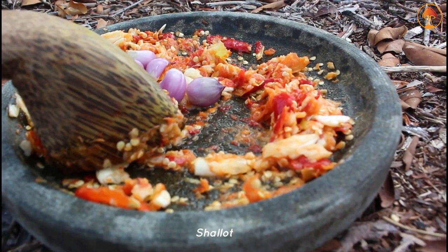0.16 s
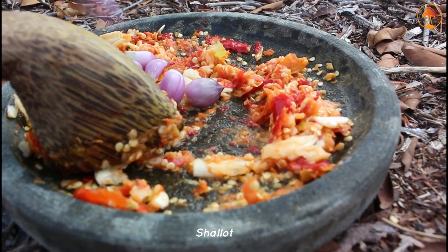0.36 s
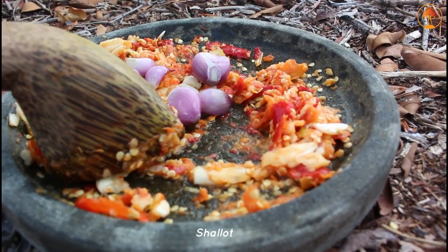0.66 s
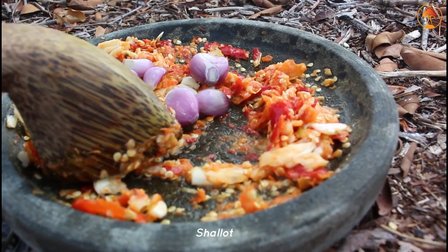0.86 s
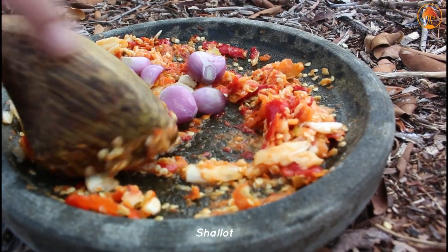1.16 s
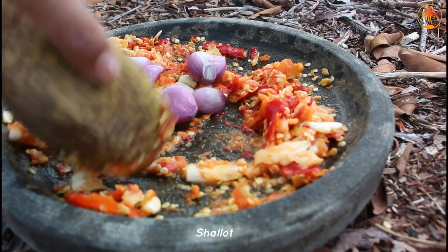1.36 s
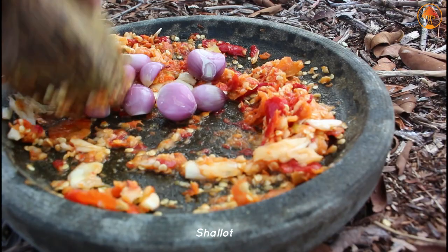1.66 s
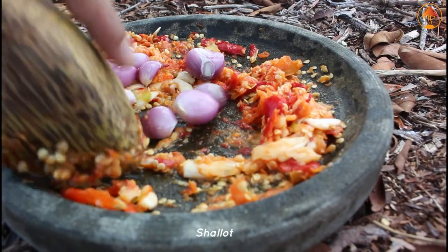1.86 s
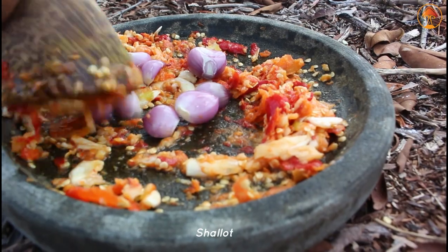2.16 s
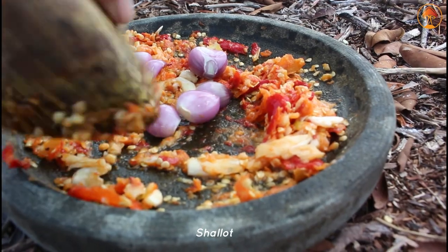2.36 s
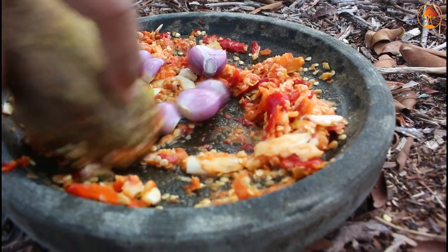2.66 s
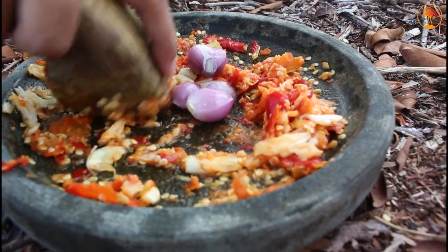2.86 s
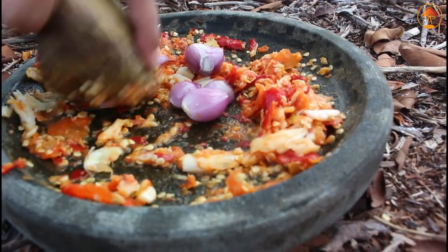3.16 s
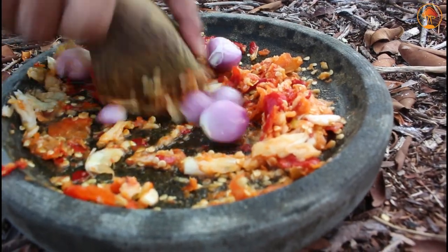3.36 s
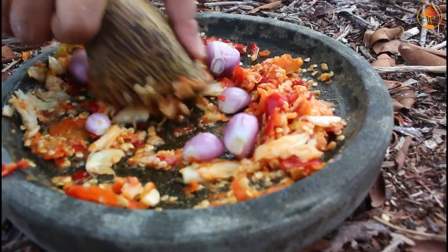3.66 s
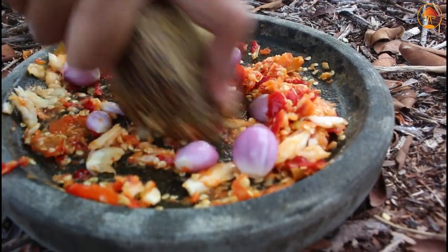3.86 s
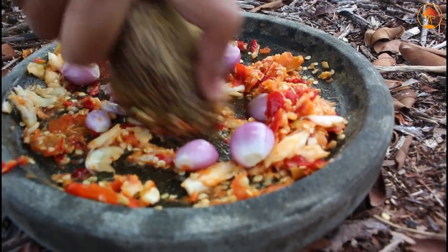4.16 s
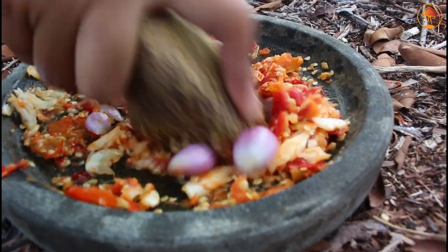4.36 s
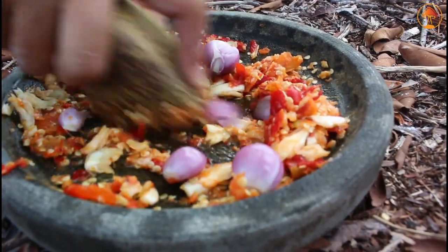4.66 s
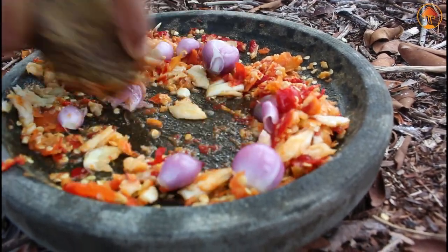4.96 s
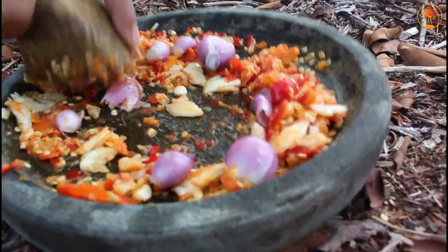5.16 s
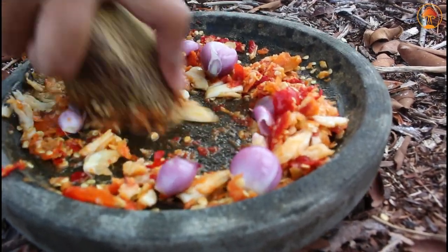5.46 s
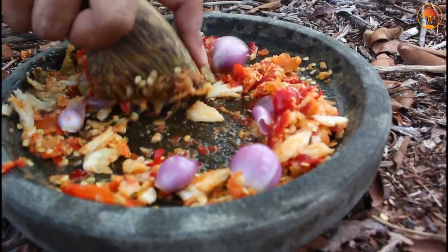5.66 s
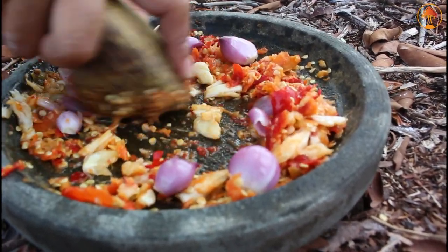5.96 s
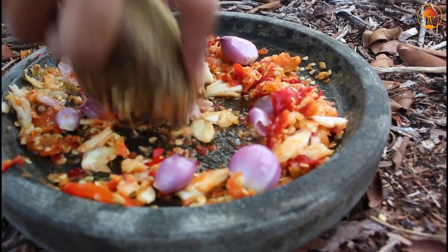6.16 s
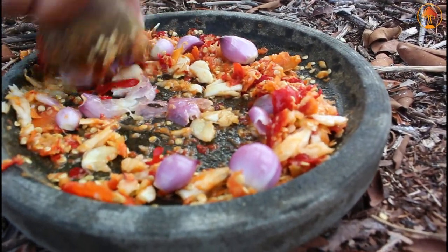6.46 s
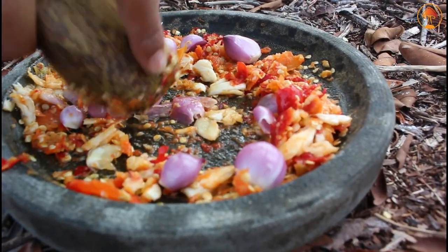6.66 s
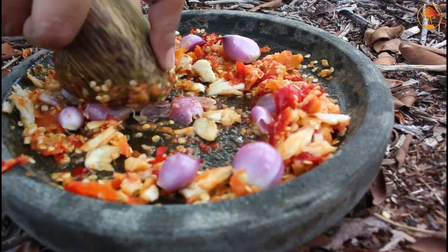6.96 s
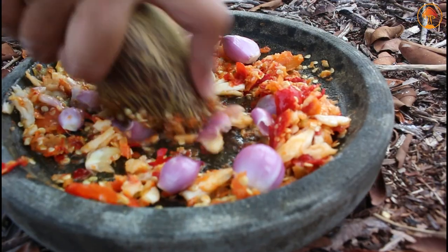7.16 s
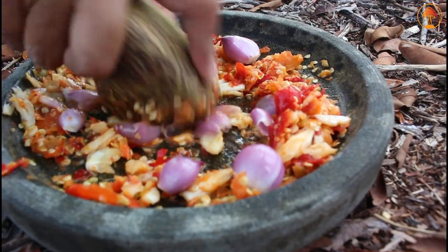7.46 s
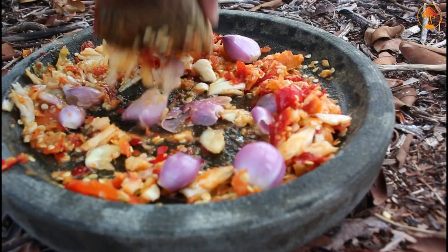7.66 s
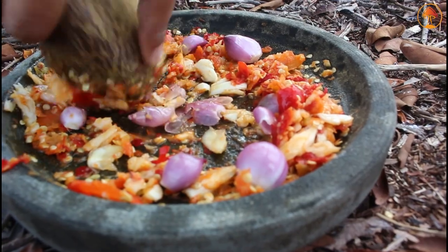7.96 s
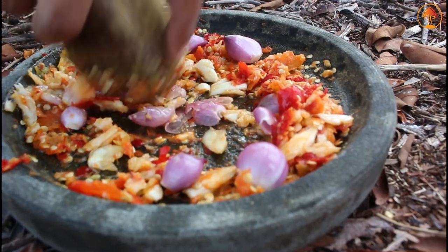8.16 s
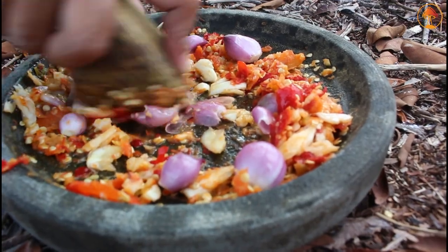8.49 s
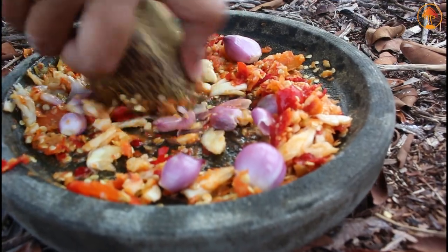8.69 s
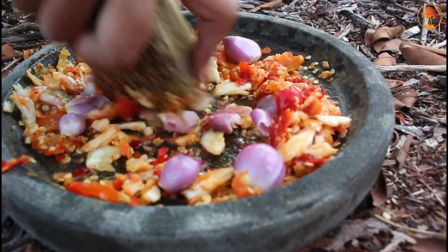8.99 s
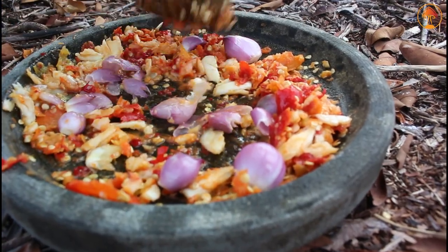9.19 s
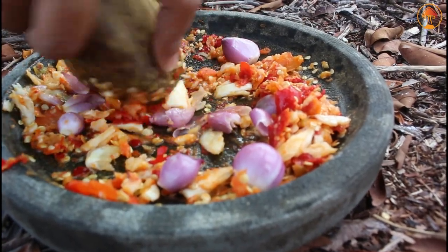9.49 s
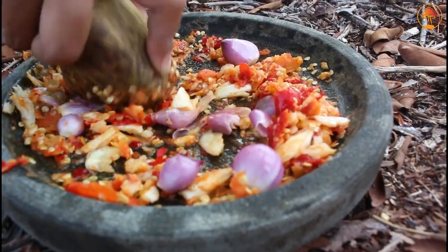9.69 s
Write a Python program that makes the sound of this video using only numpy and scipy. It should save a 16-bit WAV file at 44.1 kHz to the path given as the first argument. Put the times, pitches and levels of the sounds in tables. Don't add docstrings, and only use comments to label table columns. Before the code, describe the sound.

A close microphone beside a stone mortar outdoors catches three quiet seconds of air, insects, soft bird calls and light rustling touches. Heavy rolling grinding follows, crisp and juicy, with seed snaps, tearing flesh, small squelches and gritty stone singing. It eases near six seconds, then separate firm presses crack whole shallots loudly, with gaps of near silence between them and softer crunches at the end.

```python
import sys
import numpy as np
from scipy import signal
from scipy.fft import rfft, irfft, next_fast_len
from scipy.io import wavfile
from scipy.ndimage import uniform_filter1d, map_coordinates

SR = 44100
rng = np.random.default_rng(int(sys.argv[2]) if len(sys.argv) > 2 else 0)


def makeup_ratio(level_db):
    decades = np.asarray(level_db, float) / 20
    return 10 ** decades


def store_wav(level_fs):
    pcm = np.round(np.clip(np.atleast_2d(level_fs), -1, 1) * 32767)
    wavfile.write(sys.argv[1], SR, pcm.T.astype(np.int16))


N = 433503

# (frequency [Hz], level [dB per Hz])
FOREST_COLOUR = [(50, -40.5), (120, -7.5), (330, -12.5), (1000, -20.5), (2000, -22), (5000, -24.5),
                 (15800, -28.5), (16500, -39)]
# (frequency [Hz], level [dB per Hz])
FOREST_SIDE_COLOUR = [(30, -6), (400, -8.5), (15200, -14), (16500, -41)]
# (frequency [Hz], level [dB per Hz])
INSECT_COLOUR = [(6600, -28.5), (7400, -5.5), (8400, -5.5), (9300, -29)]
FOREST_DB = -73.5

# (time [s], length [s], top pitch [Hz], last pitch [Hz], level [dB])
HOOTS = [(1.29, 0.19, 1192, 1100, -71), (1.486, 0.043, 1116, 1114, -72), (1.566, 0.029, 1090, 1200, -67),
         (1.65, 0.14, 1164, 1135, -67), (1.893, 0.16, 1138, 1070, -67.5),
         (2.145, 0.0696, 1090, 1116, -63.5), (2.367, 0.067, 1095, 1140, -67),
         (2.611, 0.066, 1065, 1140, -67), (2.877, 0.045, 1040, 1150, -65.5)]
# (time [s], length [s], first pitch [Hz], last pitch [Hz], level [dB])
GLIDES = [
    (2.47, 0.075, 1300, 1126, -72.5),
    (2.66, 0.186, 1280, 1160, -81),
    (2.902, 0.205, 1220, 1192, -81),
    (1.12, 0.157, 4800, 3500, -74),
    (1.141, 0.075, 5950, 5950, -76),
    (2.125, 0.062, 5900, 5760, -72),
    (2.158, 0.075, 3800, 3550, -70),
    (2.163, .058, 3500, 3060, -68),
    (2.99, .05, 1220, 1200, -73.5),
    (6.39, 0.106, 3740, 3780, -73.5),
]
SCOOP = 0.93
GLIDE_EARLY = 0.34

# (time [s], thud level [dB])
WEIGHT = [(0.0, -69), (3.2, -73.5), (3.34, -45.5), (3.72, -68), (3.78, -51.5), (4.82, -68), (6.38, -59),
          (6.95, -66), (7.09, -49.5), (7.17, -74), (7.34, -58), (8.38, -69.5), (8.9, -61.5), (9.09, -78),
          (9.22, -57.5), (9.53, -84.5), (9.83, -60.5)]
# (frequency [Hz], width [Hz], level [dB])
THUMP_MODES = [(50, 16, 4), (326, 740, -10)]
THUMP_DB, THUMP_GROWS = 3, 0.75
TREMOR_DB, TREMOR_GROWS = -35.5, 0.33

# (time [s], peak level [dB], dull tock level [dB], contact time [s])
KNOCKS = [(0.447, -66.5, 12.5, 0.000086), (1.866, -54, -2.5, 0.000029), (2.139, -85, 25, 0.00015),
          (3.473, -41.5, 14, 0.000048), (4.594, -60, 6, 0.0000346), (5.072, -27, -4.5, 0.00018),
          (5.079, -69.5, 25.5, 0.00012), (5.176, -50, -8, .00012), (6.843, -76, 18, 0.000024),
          (7.82, -58.5, -3, .00004)]
# (frequency [Hz], level [dB], decay t60 [s])
STONE_MODES = [(1605, 0, .115), (2770, -12, .035), (3955, -8, .035), (5045, -10, .035)]
# (frequency [Hz], width [Hz], level [dB])
HELD_MODES = [(1605, 25, -6), (2790, 90, 0), (5050, 110, -5)]
# (frequency [Hz], width [Hz], level [dB])
WOOD_MODES = [(450, 234, -1), (803, 396.8, 0)]

# (peak time [s], dull scrape level [dB], stone ring over scrape [dB],
# fall time per 20 dB [s])
DRAGS = [(.79, -70.5, -40, 0.16), (3.31, -60.5, -3, 0.22), (3.41, -58.5, -7, 0.25),
         (3.488, -33, -7.5, 0.0014), (3.54, -69, 14, 0.2), (3.76, -57.5, 0, 0.2142),
         (3.906, -37.5, -12, 0.05), (4.115, -58.5, -2, 0.38), (4.217, -42.5, -20, 0.0427),
         (4.368, -54.5, 5, 0.1182), (4.536, -36.5, -21, 0.0453), (4.73, -56, 7, 0.1),
         (5.16, -56, -14, 0.06), (5.229, -55, -18, 0.05), (5.433, -51, -10, 0.0075),
         (5.519, -58.5, -9, 0.08), (5.665, -48, -5, 0.0157), (5.785, -59.5, 10, 0.15),
         (5.91, -49.5, 2, 0.06), (6.06, -60.5, -1, 0.1366), (6.8, -74.5, -40, 0.4),
         (7.063, -52.5, -20, 0.0156), (7.19, -53.5, 3, 0.19), (7.375, -58.5, 3, 0.19),
         (7.9, -66.5, -16, -0.17), (8.517, -62.5, -14.5, 0.1945), (8.6, -61, -18, 0.14),
         (8.874, -52.5, -14.5, 0.13), (9.36, -68, 9, 0.23), (9.83, -71, -22, -0.1)]
# (frequency [Hz], width [Hz], level [dB])
HOLLOW_MODES = [(397, 280, -8), (668, 130, -3.5), (952, 220, -0.5), (1830, 970, -8.5)]
# (time [s], length [s], low, middle and high mode levels [dB])
SINGS = [(3.469, 0.0249, -55, -36.5, -48.5), (3.529, 0.0197, -64, -51, -54),
         (3.697, 0.094, -74, -47, -56.5), (4.036, .09, -68, -52, -59.5), (4.171, .11, -75, -54.5, -59.5),
         (4.335, 0.048, -70, -45, -56.5), (4.488, 0.104, -71, -60, -60), (5.169, 0.022, -55, -70.5, -68.5),
         (5.23, 0.031, -64, -69.5, -74.5), (5.499, 0.0347, -70, -54, -65),
         (5.627, 0.0654, -60, -43.5, -59.5), (5.708, .09, -69, -51.5, -60.5), (5.866, 0.049, -59, -71, -57),
         (6.879, 0.067, -87, -72, -83), (7.029, 0.0148, -72, -44, -64.5), (8.314, 0.031, -80, -62, -70.5),
         (9.266, 0.1607, -74, -52, -64.5)]
DRAG_RISE = 0.9169
RING_SPAN = 1
HOLLOW_LAG_S = 0.013
SING_EDGE = 0.34

# (time [s], peak level [dB], pitch [Hz])
SPITS = [(0.4472, -44.5, 7500), (3.3228, -38, 10090), (3.4387, -39, 9800), (3.4695, -25, 7190),
         (3.7442, -37, 9733), (3.7658, -39, 10410), (3.9378, -41, 13640), (3.9487, -38, 7739),
         (4.1042, -37, 9420), (4.2982, -44, 12060), (4.4154, -44, 9422), (4.421, -40, 8760),
         (4.6723, -35, 9920), (5.2354, -38.5, 8450), (5.3828, -34, 7260), (5.4082, -34, 7310),
         (5.4175, -34, 7130), (5.4437, -32, 9688), (5.4617, -38, 10030), (5.4706, -41, 8448),
         (5.6827, -42, 8360), (5.7741, -32, 11220), (6.0946, -32, 7280), (6.1066, -43, 7350),
         (7.0447, -34.5, 8737), (7.1104, -36, 13350), (7.1715, -36, 8290), (7.1913, -31, 10170),
         (7.1938, -40, 9110), (7.3315, -35, 9990), (7.3742, -43, 9370), (7.435, -34, 7184),
         (8.4614, -36, 7545), (8.5117, -37, 8300), (8.5813, -34, 7560), (8.7394, -42, 14730),
         (8.8863, -35.5, 9790), (8.8923, -39, 9642), (8.9085, -41, 7920), (9.6357, -41.5, 12930)]
# (time [s], peak level [dB])
GULPS = [
    (3.4728, -16),
    (3.4855, -19.5),
    (4.526, -27),
    (4.538, -30.5),
    (4.596, -35),
]
# (frequency [Hz], width [Hz], level [dB])
POCKET_MODES = [(960, 170, 33)]
SPIT_T60, SPIT_DB = 0.0046, 4.5

# (time [s], peak level [dB], pitch [Hz])
SNAPS = [(0.4476, -32.5, 3090), (1.0844, -43, 6700), (3.2326, -28, 5100), (3.3076, -7.5, 5230),
         (3.3267, -18, 5490), (3.731, -11, 5540), (4.783, -27, 3490), (5.2362, -27, 3400),
         (5.246, -28, 3500), (5.3085, -20, 6400), (5.3827, -13.5, 3730), (5.4284, -6, 3650),
         (5.6423, -17.5, 4600), (5.7807, -34.5, 3494), (6.1469, -48.5, 4725), (7.0296, -19, 3300),
         (7.1185, -14, 3440), (7.1622, -20, 3050), (7.325, -24.5, 3952), (7.3845, -14, 2623),
         (8.462, -17, 3290), (8.608, -16, 3540), (8.8744, -17, 2690), (9.738, -32.5, 3380),
         (9.8217, -41, 6710)]
# (time [s], peak level [dB], pitch [Hz])
SPLITS = [(1.281, -50, 6400), (1.293, -50, 5300), (1.309, -43, 2580), (2.243, -45, 3000),
          (2.286, -48.5, 3300), (2.701, -46, 5460), (3.47, -17.5, 5050), (3.9433, -17, 3500),
          (4.1437, -25, 3180), (4.2805, -22, 3748), (5.348, -34.5, 3500), (5.3541, -33, 3690),
          (5.4168, -14, 3930), (7.0418, -17, 3127), (7.045, -18.5, 3025), (7.1712, -25.5, 3180),
          (7.332, -24.5, 3845), (7.368, -26, 3370), (7.435, -25, 3500), (8.4145, -30, 3100),
          (8.659, -40.5, 2000), (8.497, -21.5, 2570), (8.9267, -36.5, 5059)]
# (time [s], peak level [dB], pitch [Hz])
TEARS = [(2.872, -50, 3600), (3.2972, -9.5, 3500), (3.4221, -23.5, 5390), (3.9974, -11, 3390),
         (5.6321, -28.5, 4710), (7.0656, -16, 3294), (7.0687, -19, 3500), (7.0712, -17.5, 3400),
         (7.0744, -20, 3310), (7.1904, -23, 3754), (8.2499, -34, 1720), (8.5734, -25, 3610),
         (8.5916, -33.5, 2870), (8.613, -26.5, 3430), (8.8697, -20.5, 2800)]
# (time [s], peak level [dB], pitch [Hz], low body level [dB])
POPS = [(1.723, -58.5, 2919, 4.5), (3.2898, -21.5, 4600, -13), (3.4, -27.5, 5270, -10),
        (3.4737, -24, 3000, -3.5), (4.356, -25, 2890, -9), (4.638, -30.5, 3750, -10.5),
        (1.868, -35.5, 2170, -23), (5.073, -34.5, 2170, -15.5), (5.431, -15, 1690, -19.5),
        (5.813, -28, 3663, -12), (5.9451, -30.5, 2030, -16), (7.5275, -38, 3320, -6),
        (7.821, -36.5, 1060, -14), (7.869, -37, 1780, -18.5), (8.762, -31.5, 2900, -8.5),
        (9.795, -35.5, 3760, -15)]
# (time [s], peak level [dB], pitch [Hz])
BURSTS = [
    (7.0507, 5, 3320),
    (7.0509, -8, 5130),
    (8.4917, -5, 2930),
]
# (time [s], peak level [dB], pitch [Hz])
CRUMBS = [(1.0867, -45, 3360), (2.232, -44, 3570), (2.8687, -47, 3500), (3.171, -42, 5400),
          (3.2575, -38.5, 5250), (3.4396, -31, 3620), (3.453, -29, 5700), (3.7183, -29, 2930),
          (3.723, -26, 3530), (3.7661, -26, 2930), (3.9377, -29, 3550), (3.9728, -37.5, 3530),
          (3.9784, -34, 3700), (4.2739, -34, 3400), (4.2995, -34, 3550), (4.3647, -27.5, 2950),
          (4.4394, -35.5, 4800), (4.5973, -32.5, 1515), (4.6723, -41, 6030), (4.7878, -35, 3380),
          (4.801, -34.5, 2020), (4.8043, -32, 2030), (4.8119, -36, 3400), (5.2589, -29, 3320),
          (5.2678, -32, 3320), (5.2762, -27, 3250), (5.371, -32, 3060), (5.4082, -23, 2530),
          (5.464, -25, 3590), (5.2535, -38, 3400), (5.6061, -42, 3320), (5.6841, -27, 2980),
          (5.7786, -31, 3510), (5.8331, -34.5, 1770), (6.1445, -44, 4820), (6.5526, -38, 3460),
          (7.1236, -30, 3630), (7.1822, -30.5, 2930), (7.3446, -34, 3620), (7.535, -40, 3490),
          (7.8798, -25, 1650), (7.8943, -39, 3700), (8.3169, -46, 2970), (8.3279, -41, 2930),
          (8.3906, -42, 3010), (8.512, -23, 2710), (8.5172, -24, 3590), (8.5812, -26.5, 2320),
          (8.5913, -26, 2970), (8.6699, -35.5, 3640), (8.7659, -34, 3680), (8.7852, -43, 3140),
          (8.8221, -31, 3040), (8.8253, -30, 2970), (8.9187, -41, 4780), (9.3387, -25.5, 2950),
          (9.6362, -47, 4010), (9.7036, -37.5, 1713)]
# (low body [dB], t60 [s])
SNAP, SPLIT, TEAR = (-29.5, 0.001978), (-27.5, 0.0037), (-20.5, 0.008)
CRUMB, BURST = (-21.5, 0.0037), (-41, 0.0023)
POP_T60 = 0.0044

# (peak time [s], rustle level [dB], rise time per 20 dB [s], fall time per 20
# dB [s], juice fizz over rustle [dB])
TOUCHES = [
    (1.299, -63.5, 0.2, 0.13, -11.5),
    (1.73, -77, 0.4, -0.4, -15.5),
    (1.865, -66, 0.28, -0.27, -16),
    (2.283, -58.5, 0.05, 0.05, -11),
    (2.606, -67, 0.2, 0.13, -8.5),
    (2.869, -68.5, 0.3, 0.24, -11.5),
]
# (peak time [s], crunch level [dB], rise per 20 dB [s], fall per 20 dB [s], fizz over crunch [dB])
GRINDS = [(3.299, -43.5, 0.11, 0.12, -15), (3.39, -47, 0.023, 0.14, -9.5), (3.46, -41, 0.14, 0.035, -12.5),
          (3.565, -50, 0.023, 0.17, -12), (3.754, -39, 0.087, 0.073, -11.5),
          (3.939, -46.5, 0.12, 0.071, -10.5), (3.998, -50, 0.084, 0.0123, 0.5),
          (4.117, -43.5, 0.095, 0.028, -11), (4.206, -54, 0.033, 1, -12), (4.364, -44.5, 0.12, 0.12, -9),
          (4.58, -62.5, 0.059, 0.38, -1.5), (4.743, -46, 0.2, 0.11, -14.5), (4.86, -58.5, 0.065, 0.065, -5),
          (5.17, -65.5, 0.08, 0.031, -12), (5.252, -39.5, 0.053, 0.067, -15.5),
          (5.325, -47.5, 0.059, 0.035, -14), (5.423, -32.5, .061, 0.0879, -16),
          (5.535, -54.5, 0.2, 0.013, -11.5), (5.639, -42, 0.035, 0.0285, -9.5),
          (5.678, -45, 0.052, 0.0096, -13.5), (5.725, -49.5, 0.017, 0.075, -17),
          (5.787, -45, 0.076, 0.0556, -6), (5.935, -53, 0.061, 0.12, -9),
          (6.054, -37, 0.055, 0.0636, -16.5), (6.15, -60, .05, 0.0856, -8.5)]
# (peak time [s], crunch level [dB], rise per 20 dB [s], fall per 20 dB [s],
# fizz over crunch [dB])
PRESSES = [(6.487, -53.5, 0.047, 0.106, -15), (6.535, -49, 0.11, 0.036, -18), (7.035, -63.5, .045, 0.03, 1),
           (6.93, -70.5, .11, 0.056, -6.5), (7.071, -31, 0.025, 0.0123, -24.5),
           (7.12, -51.5, 0.022, 0.1096, -24.5), (7.189, -41.5, 0.18, 0.091, -11),
           (7.331, -50, 0.0564, 0.0347, -4.5), (7.382, -35.5, 0.0301, 0.0209, -22.5),
           (7.42, -63, 0.04135, 0.22, -1.5), (7.525, -56.5, 0.33, 0.0725, -10.5),
           (7.822, -64, 0.0172, 0.11, -19), (7.885, -45.5, 0.0293, 0.0815, -17),
           (8.325, -67, 0.02354, 0.0406, -10), (8.449, -57, 0.1575, 0.127, -7.5),
           (8.525, -37, 0.07248, 0.103, -17), (8.61, -44, 0.11, 0.02952, -18),
           (8.71, -47.5, 0.0542, 0.164, -10), (8.83, -45, 0.164, 0.103, -26),
           (8.885, -40, 0.027, 0.0374, -4), (8.999, -52, 0.08506, 0.051, -8),
           (9.272, -46.5, 0.02194, 0.056, -17), (9.364, -42, 0.0671, 0.071, -16),
           (9.634, -60.5, 0.01875, 0.0336, -5.5), (9.769, -60, 0.2, 0.079, -11)]
# (frequency [Hz], level [dB per Hz])
PULP_COLOUR = [(500, -46.5), (1600, -16.5), (2700, -4), (3600, 0.5), (4700, -11), (5600, -5.5), (8000, -25),
               (13000, -50)]
# (frequency [Hz], level [dB per Hz])
RUSTLE_COLOUR = [(700, -40), (1800, -9.5), (3400, 0), (5900, -3), (7500, -15)]
# (frequency [Hz], level [dB per Hz])
FIZZ_COLOUR = [(3820, -34), (6500, -7), (7390, -3), (15700, -5.5), (16500, -9)]
SWELL_SHAPE = 1.097
REST_CRUNCH_DB, REST_FIZZ_DB, REST_SCRAPE_DB, REST_RING_DB = -85.5, -93, -84, -110


def unit(x):
    return x / np.sqrt(np.mean(x ** 2) + 1e-20)


def curves(rows):
    s, *cols = np.transpose(rows)
    return [np.interp(np.arange(N) / SR, s, c) for c in cols]


def wobble(rate):
    knots = rng.standard_normal(int(N * rate / SR) + 4)
    return map_coordinates(knots, [np.arange(N) * rate / SR])


def filtered(x, response):
    m = next_fast_len(N + SR // 2)
    return irfft(rfft(x, m) * response(np.fft.rfftfreq(m, 1 / SR)), m)[:N]


def coloured(x, points):
    hz, db = np.transpose(points)
    return unit(filtered(x, lambda f: makeup_ratio(np.interp(np.log(f + 1), np.log(hz + 1), db))))


def resonances(modes):
    def response(f):
        total = 0
        for k, (centre, width, db) in enumerate(modes):
            damping = 1j * f * width
            total = total + (-1) ** k * makeup_ratio(db) * damping / (centre * centre - f * f + damping)
        return total
    return response


def laid(starts, shapes):
    at = np.round(starts * SR).astype(int)[:, None] + np.arange(shapes.shape[1])
    return np.bincount(at.ravel(), shapes.ravel(), N + SR)[:N]


def grains(count, centre_hz, spread, turns, uneven_db):
    when, size = rng.random((count, 2)).T
    hz = np.clip(centre_hz * np.exp(spread * rng.standard_normal((count, 1))), 300, 15000)
    t = np.arange(96) / SR
    gain = makeup_ratio(-uneven_db * np.log(size + 0.01))[:, None]
    shapes = np.sin(2 * np.pi * hz * t) * np.exp(-hz * t / turns) * gain
    return unit(laid(when * N / SR, shapes))


def grit(count, uneven_db, smooth_db):
    when, size, sign = rng.random((count, 3)).T
    heights = np.sign(sign - 0.5) * makeup_ratio(-uneven_db * np.log(size + 0.01))
    ticks = laid(when * N / SR, heights[:, None])
    return unit(unit(ticks) + makeup_ratio(smooth_db) * rng.standard_normal(N))


def patched(x, depth_db):
    z = signal.stft(x, nperseg=256)[2]
    field = uniform_filter1d(rng.standard_normal(z.shape), size=7, axis=0)
    field = uniform_filter1d(field, size=12, axis=1)
    return signal.istft(z * makeup_ratio(depth_db * unit(field)), nperseg=256)[1][:N]


def swells(s, db, rise, fall, rest_db):
    t = np.arange(0, N / SR + 0.002, 0.001)[:, None]
    away = np.where(t < s, (s - t) / np.abs(rise), (t - s) / np.abs(fall))
    power = (makeup_ratio(db - 20 * away ** SWELL_SHAPE) ** 2).sum(1) + makeup_ratio(rest_db) ** 2
    return np.interp(np.arange(N) / SR, t[:, 0], 10 * np.log10(power))


def forest():
    mid = makeup_ratio(FOREST_DB) * coloured(rng.standard_normal(N), FOREST_COLOUR)
    mid += makeup_ratio(FOREST_DB - 5) * coloured(rng.standard_normal(N), INSECT_COLOUR)
    side = makeup_ratio(FOREST_DB - 3) * coloured(rng.standard_normal(N), FOREST_SIDE_COLOUR)
    return np.array([mid + side, mid - side])


def bird():
    song = np.zeros(N)
    notes = [(s, length, SCOOP * top, top, last, db) for s, length, top, last, db in HOOTS]
    for s, length, first, last, db in GLIDES:
        notes.append((s, length, first, first + GLIDE_EARLY * (last - first), last, db))
    for s, length, first_hz, bend_hz, last_hz, db in notes:
        u = np.linspace(0, 1, round(length * SR))
        hz = np.interp(np.sqrt(u), [0, 0.6, 1], [first_hz, bend_hz, last_hz])
        tone = np.sin(2 * np.pi * np.cumsum(hz) / SR)
        song[round(s * SR):][:len(u)] += makeup_ratio(db - 1.0) * np.sin(np.pi * u) ** 0.57 * tone
    song *= makeup_ratio(2.2 * wobble(70))
    trees = rng.standard_normal(SR // 2) * makeup_ratio(-60 * np.arange(SR // 2) / SR / 0.5027)
    return song + makeup_ratio(-12.5) * signal.fftconvolve(song, trees / np.linalg.norm(trees))[:N]


def ground():
    push_db = curves(WEIGHT)[0]
    lumps = rng.standard_normal((2, N)) * makeup_ratio(3.1 * wobble(17))
    deep = filtered(lumps[0], lambda f: resonances([(13, 11, 0)])(f) ** 2)
    thud = filtered(lumps[1], lambda f: resonances([(42, 38, 0)])(f) ** 2)
    s, db = np.transpose([r[:2] for r in TEARS + SPLITS + BURSTS + POPS])
    pushes = makeup_ratio(THUMP_GROWS * db + THUMP_DB)[:, None] * np.hanning(40) / 20
    thumps = filtered(laid(s, pushes), resonances(THUMP_MODES))
    tremor = makeup_ratio(TREMOR_GROWS * push_db + TREMOR_DB) * unit(deep)
    return tremor + makeup_ratio(push_db - 0.5) * unit(thud) + thumps


def stone(f):
    return resonances([(hz, np.log(1000) / np.pi / t60, db) for hz, db, t60 in STONE_MODES])(f)


def knocks():
    s, db, tock_db, contact = np.transpose(KNOCKS)[:, :, None]
    u = np.arange(100) / SR / np.clip(contact, 2e-5, 3e-4)
    blow = u * np.exp(-u)
    blow /= blow.sum(1, keepdims=True)
    s = s[:, 0] + 0.0014
    ring = filtered(laid(s, makeup_ratio(db + 54.5) * blow), stone)
    tock = filtered(laid(s, makeup_ratio(db + tock_db + 40.5) * blow), resonances(WOOD_MODES))
    return ring + tock


def singing():
    gain = np.zeros((len(HELD_MODES), N + SR))
    for s, length, *db in SINGS:
        u = np.linspace(0, 1, round(abs(length) * SR))
        swell = np.abs(np.sin(np.pi * u)) ** SING_EDGE
        gain[:, round(s * SR):][:, :len(u)] += makeup_ratio(np.array(db))[:, None] * swell
    rub = rng.standard_normal(N)
    song = np.zeros(N)
    for g, mode in zip(gain, HELD_MODES):
        grip = makeup_ratio(2.5 * wobble(80) - 2)
        song += g[:N] * grip * unit(filtered(rub, resonances([mode])))
    return song


def spits():
    s, db, hz = np.transpose(SPITS)[:, :, None]
    t = np.arange(200) / SR
    blur = 1 + 1.1 * rng.standard_normal((len(s), len(t)))
    fade = makeup_ratio(db + SPIT_DB - 60 * t / SPIT_T60) * (1 - np.exp(-t / 0.00017))
    high = laid(s[:, 0], fade * blur * np.sin(2 * np.pi * hz * t))
    high = filtered(high, lambda f: f ** 2 / (f ** 2 + 5000 ** 2))
    s, db = np.transpose(GULPS)
    return high + filtered(laid(s, makeup_ratio(db)[:, None] * np.hanning(16) / 7), resonances(POCKET_MODES))


def cracks():
    kinds = [(SNAPS, SNAP), (SPLITS, SPLIT), (TEARS, TEAR), (POPS, (POP_T60,)), (BURSTS, BURST), (CRUMBS, CRUMB)]
    rows = [tuple(row) + make for table, make in kinds for row in table]
    s, db, hz, low_db, t60 = np.transpose(rows)[:, :, None]
    t = np.arange(500) / SR
    t60 = np.clip(t60, 0.0015, 0.03)

    def fade(life):
        return makeup_ratio(-60 * t / life) * (1 - np.exp(-t / 0.00024))

    noise = rng.standard_normal((len(s), 3, len(t)))
    partner_hz = np.where(hz > 4400, hz / 1.6, 1.706 * hz)
    tone = np.sin(2 * np.pi * hz * t) + 0.36 * np.sin(2 * np.pi * partner_hz * t)
    edge_db = 0.56 * db - 38.5 + 5 * np.log2(hz / 3500)
    body = laid(s[:, 0], makeup_ratio(db + 4) * tone * fade(np.minimum(t60, 0.0045)))
    tail = laid(s[:, 0], makeup_ratio(db - 10.5) * noise[:, 0] * fade(2.174 * t60))
    low = laid(s[:, 0], makeup_ratio(db + low_db + 12.0) * noise[:, 1] * fade(1.6 * t60))
    edge = laid(s[:, 0], makeup_ratio(edge_db) * noise[:, 2] * fade(t60))
    tail = filtered(tail, resonances([(3186.0, 1600, 7.5), (5700, 2100, 4.3)]))
    low = filtered(low, resonances([(1150, 2400, 0.00286)]))
    edge = filtered(edge, resonances([(11000, 14000, 0.00078)]))
    return body + tail + low + edge


def dragging():
    s, db, ring_db, fall = np.transpose(DRAGS)
    scrape_db = swells(s, db, DRAG_RISE * fall, fall, REST_SCRAPE_DB)
    return scrape_db, swells(s, db + ring_db, RING_SPAN * fall, RING_SPAN * fall, REST_RING_DB)


def crushing():
    s, db, rise, fall, juice_db = np.transpose(TOUCHES + GRINDS + PRESSES)
    light, heavy = slice(len(TOUCHES)), slice(len(TOUCHES), None)
    crunch_db = swells(s[heavy], db[heavy], rise[heavy], fall[heavy], REST_CRUNCH_DB)
    rustle_db = swells(s[light], db[light], rise[light], fall[light], REST_CRUNCH_DB)
    return crunch_db, swells(s, db + juice_db, rise, fall, REST_FIZZ_DB), rustle_db


def stone_ring(ring_db, crunch_db, clump):
    drag = rng.standard_normal(N) * makeup_ratio(2.1 * clump + 3 * wobble(22))
    held = resonances(HELD_MODES)
    ring_db = ring_db - 4 + np.minimum(0, crunch_db + 70)
    return filtered(drag * makeup_ratio(ring_db), held) / np.std(filtered(drag, held))


def hollow_scrape(scrape_db, clump):
    rub = grit(count=9000, uneven_db=5.5, smooth_db=0)
    rub = rub * makeup_ratio(0.6 * clump + 1.6 * wobble(90))
    low = filtered(rub, lambda f: resonances(HOLLOW_MODES[:2])(f) ** 1.37)
    high = filtered(rub, lambda f: resonances(HOLLOW_MODES[2:])(f) ** 1.37)
    late_db = np.roll(scrape_db, round(HOLLOW_LAG_S * SR))
    return (makeup_ratio(late_db) * low + makeup_ratio(scrape_db) * high) / np.std(low + high)


def skin_rustle(clump, slip):
    skins = coloured(grit(count=9000, uneven_db=5.5, smooth_db=-4.5), RUSTLE_COLOUR)
    return unit(skins * makeup_ratio(2 * slip + clump))


def juice_fizz(clump, slip):
    fizz = coloured(grit(count=25000, uneven_db=5.0, smooth_db=-8.5), FIZZ_COLOUR)
    return unit(patched(fizz, depth_db=2.5) * makeup_ratio(1.0 * clump + 3.0 * slip))


def pulp_crunch(clump, slip):
    wet = coloured(grit(count=30000, uneven_db=4.5, smooth_db=-2), PULP_COLOUR)
    fractures = grains(count=9000, centre_hz=3500, spread=0.3, turns=6.2, uneven_db=2.5)
    crunch = unit(wet + makeup_ratio(-4.0) * fractures)
    return unit(patched(crunch, depth_db=3.2) * makeup_ratio(1.2 * clump + 4 * slip))


def strokes():
    crunch_db, fizz_db, rustle_db = crushing()
    scrape_db, ring_db = dragging()
    clump = wobble(45)
    slip = wobble(160)
    mix = stone_ring(ring_db, crunch_db, clump) + hollow_scrape(scrape_db, clump)
    mix += makeup_ratio(rustle_db) * skin_rustle(clump, slip)
    mix += makeup_ratio(fizz_db) * juice_fizz(clump, slip)
    return mix + makeup_ratio(crunch_db) * pulp_crunch(clump, slip)


def scene():
    return forest() + bird() + ground() + knocks() + singing() + spits() + cracks() + strokes()


def band_limit(x):
    return signal.sosfilt(signal.butter(12, 16600, fs=SR, output="sos"), x)


def record(dry):
    limited = dry / (1 + np.abs(dry / 0.95) ** 6) ** (1 / 6)
    mix = np.array([filtered(side, lambda f: np.where(f < 15900, 1, makeup_ratio(-22))) for side in limited])
    return band_limit(mix)


dry = scene()
out = record(dry)
store_wav(out)
```